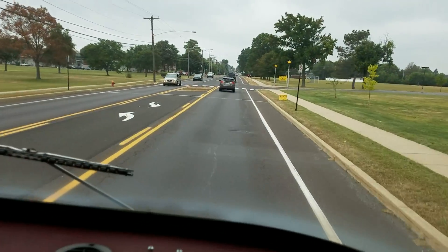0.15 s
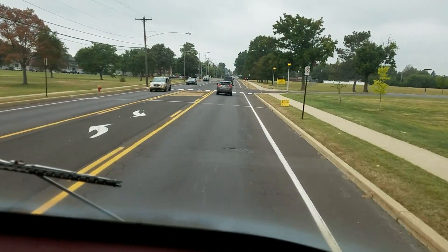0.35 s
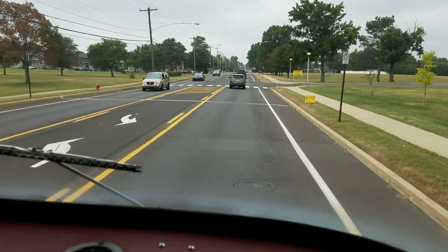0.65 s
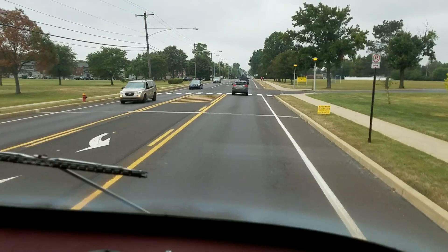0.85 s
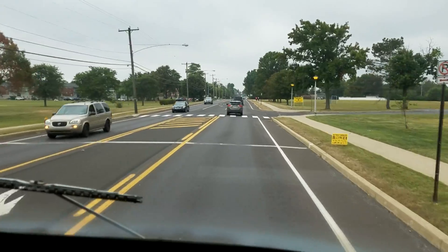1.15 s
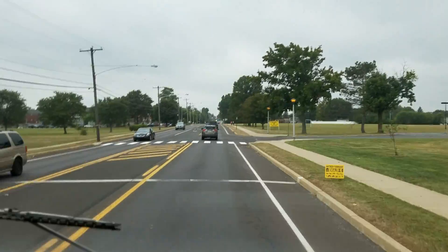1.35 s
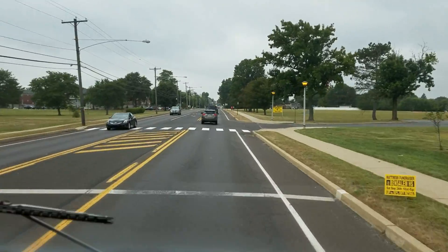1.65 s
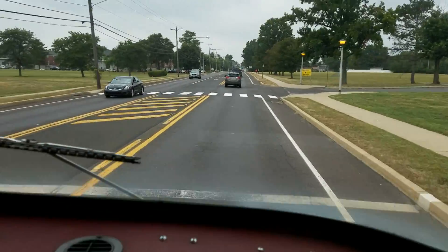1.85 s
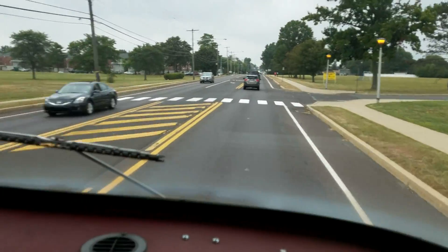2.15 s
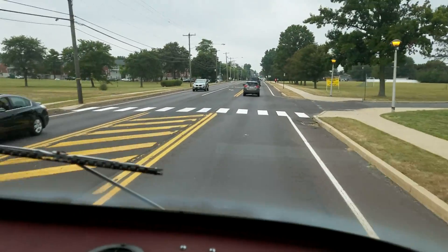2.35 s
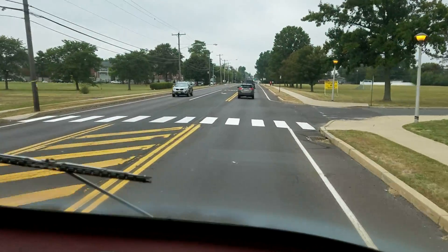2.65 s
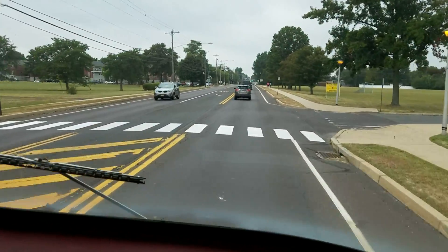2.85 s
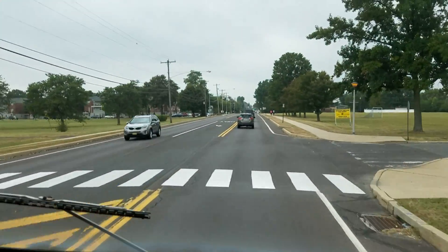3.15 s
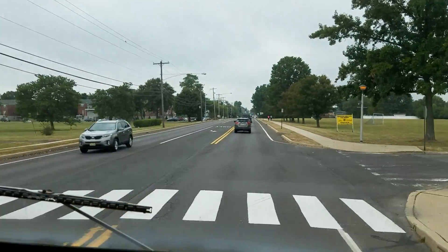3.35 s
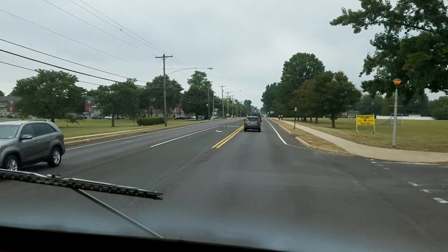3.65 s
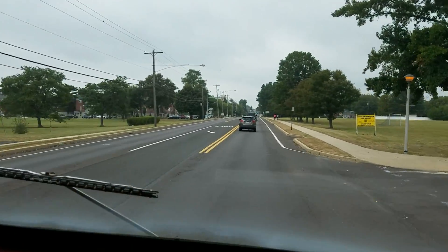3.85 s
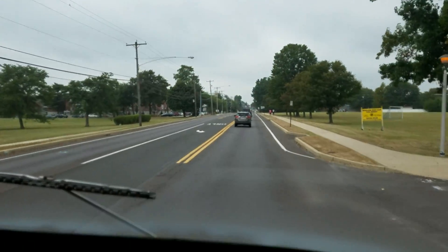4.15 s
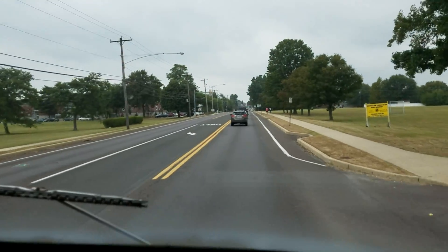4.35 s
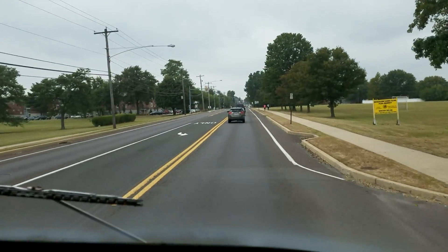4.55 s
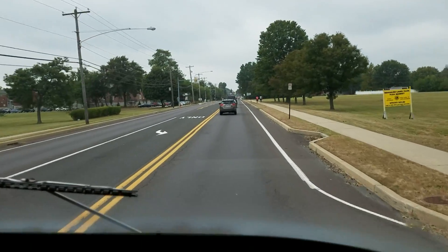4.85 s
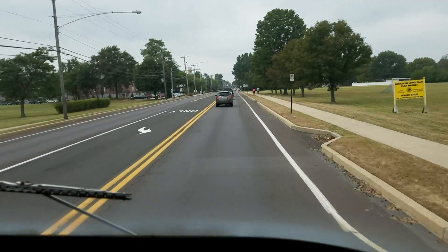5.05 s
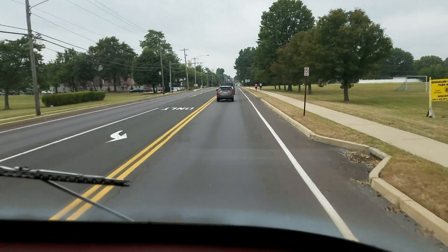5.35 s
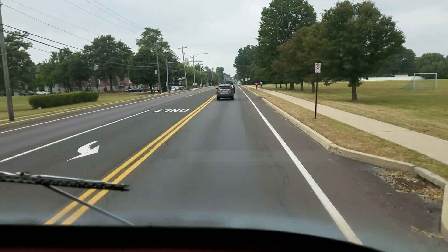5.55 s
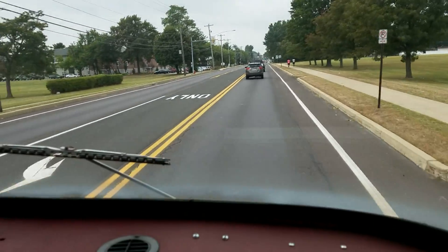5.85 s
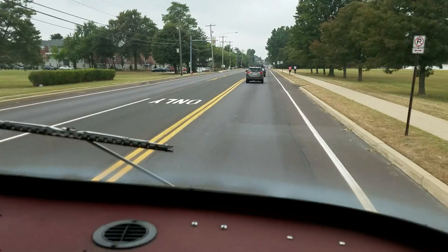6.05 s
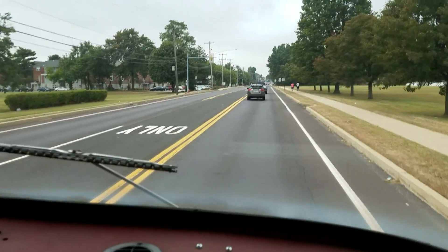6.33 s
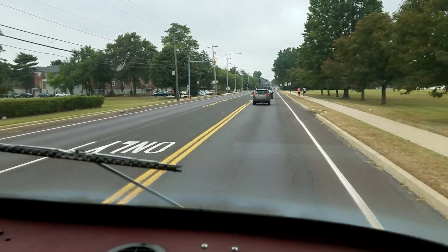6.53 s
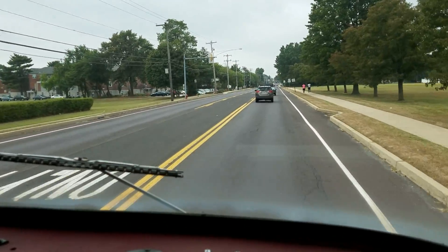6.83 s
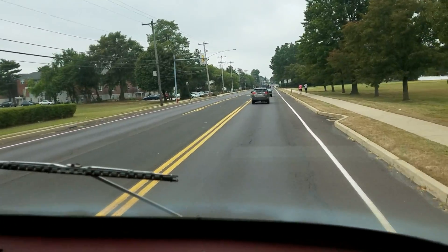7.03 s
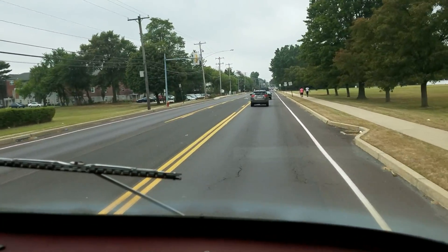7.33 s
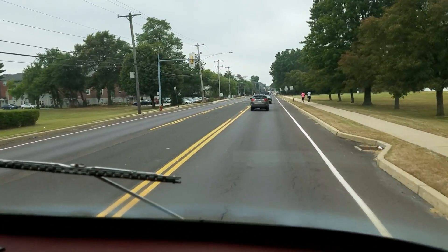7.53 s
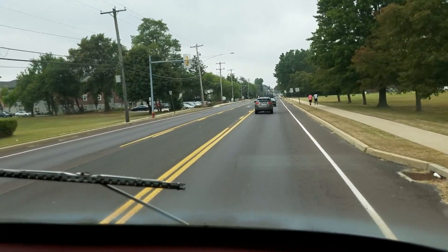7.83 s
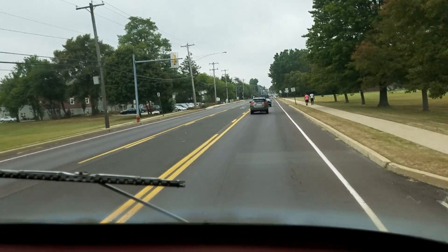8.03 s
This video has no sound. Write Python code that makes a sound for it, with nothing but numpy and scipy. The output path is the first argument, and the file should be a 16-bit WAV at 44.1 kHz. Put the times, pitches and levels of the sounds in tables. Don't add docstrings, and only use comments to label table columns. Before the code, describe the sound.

Deep, buzzing diesel engine drone from inside a moving truck cab, swelling and easing over rumbling road, with knocks, rattles and wind thumps.

```python
import sys
import numpy as np
from scipy import signal
from scipy.fft import rfft, irfft, next_fast_len
from scipy.io import wavfile
from scipy.ndimage import uniform_filter1d, minimum_filter1d, map_coordinates

SR = 44100
rng = np.random.default_rng(int(sys.argv[2]) if len(sys.argv) > 2 else 0)


def boost(x):
    u = np.asarray(x, float) / 20
    return 10 ** u


def store_wav(level_fs):
    pcm = np.round(np.clip(np.atleast_2d(level_fs), -1, 1) * 32767)
    wavfile.write(sys.argv[1], SR, pcm.T.astype(np.int16))


N = 361175

# time_s, speed_rpm
CRANK_SPEED = [
    (0, 1553),
    (0.8, 1547),
    (2.0, 1534),
    (2.8, 1532),
    (4.4, 1542),
    (5.6, 1548),
    (6.1, 1555),
    (6.8, 1546),
    (7.6, 1524),
    (8.19, 1502),
]
# order, left_db, right_db, load_share (-0.2 to 2)
CRANK_ORDERS = [(3, -37, -38, 0.5), (4, -17, -19, 0.5), (5, -27, -24, 0.1), (6, -25, -27, 0.9),
                (7, -36, -36, -0.2), (8, -16, -16, 1.3), (9, -24, -23, 0.7), (10, -41, -44, 0.2),
                (11, -23, -28, 1.1), (12, -36, -35, 0.9), (13, -43, -41, 1.5), (15, -34, -40, 0.8),
                (16, -43, -37, 0.9), (17, -34, -40, 2.0), (20, -39, -34, 0.8), (21, -40, -39, 1.0),
                (22, -39, -39, 1.0), (23, -43, -55, 0.6), (24, -37, -51, 0.0), (25, -46, -43, 0.1),
                (28, -40, -45, 0.0), (29, -38, -36, 0.5), (30, -40, -41, 1.2), (31, -41, -47, 0.5),
                (33, -40, -50, 0.5), (35, -42, -42, 0.8), (36, -45, -40, 1.0), (38, -41, -47, 1.1),
                (40, -40, -38, 0.8), (42, -36, -47, 1.2)]
# order, level_db
COASTING_GEARS = [
    (14, -37),
    (32, -36),
]
# time_s, load_db (against full throttle)
THROTTLE = [(0, -7), (.32, -14), (.64, -9), (1.0, -10), (1.28, -5), (1.44, -6), (1.7, -1.2), (2.1, -1.5),
            (2.5, -0.2), (5.45, -1.04), (5.6, -1), (5.76, -7.5), (6.4, -4), (6.7, -9), (7.04, -2),
            (7.36, -5), (7.55, -11.5), (8.19, -11.5)]
# time_s, lift_db, length_s
CAB_SWAY = [
    (.5, -1.5, .5),
    (1.497, 5.5, 0.12),
    (1.998, 2.5, 0.066),
    (2.724, -1, 0.049),
    (3.5, -2.2, .4),
    (3.998, 3, 0.12),
    (4.55, 2, 0.41),
    (5.45, 1.5, .15),
    (6.245, 2, .2),
    (7.35, -6, 0.42),
]
# time_s, coarseness_db
ROAD_SURFACE = [(0, -3.5), (.8, -4), (1.12, -4.5), (1.37, 2.5), (1.9, 2.5), (2.64, 2.5), (3.03, 1),
                (4.72, 0.5), (5.5, 0.4), (5.77, -2), (6.5, -3.5), (6.75, -2), (7.21, 3.5), (7.37, 3.5),
                (7.53, -0.7), (8.19, 0.2)]
# time_s, rumble_lift_db, length_s
SEAM_BUMPS = [(.01, 5.5, .06), (.24, -1, 0.16), (1.4, 7, 0.21), (1.8, 6, 0.27), (2.7, 4.5, .1),
              (4.88, 6, 0.055), (5.15, 3.5, .15), (5.5, 4, 0.093), (5.75, 3.5, 0.4), (7.21, 5, 0.18),
              (7.55, 2.5, 0.18), (8.1, 3, 0.27)]
# time_s, lift_db, length_s
WHINE_SWELLS = [(.93, 9, 0.2), (1.64, 12, .06), (1.93, 7, .05), (2.2, 11, 0.35), (3.24, 5, 0.084),
                (3.44, 15, 0.03), (4.0, 7.5, .4), (4.63, 10, 0.031), (4.95, 11, 0.069), (5.31, 14, 0.062),
                (6.2, 9.5, 0.26), (6.45, 6, 0.038), (7.05, 6.5, 0.3), (7.5, 13, 0.4), (8.19, 7, 0.15)]
# time_s, peak_db
TRIM_RATTLES = [(0.0258, -40), (0.6913, -39), (0.895, -43), (1.085, -42), (1.3504, -22), (1.4711, -36),
                (1.5354, -29), (1.5788, -41), (1.6821, -31), (1.8362, -31), (1.8557, -30), (2.0203, -40),
                (2.1355, -36), (2.5541, -40), (3.1852, -40), (3.457, -38), (3.5753, -31), (3.7479, -28),
                (3.9973, -34), (4.2228, -34), (5.0444, -36), (5.6291, -40), (6.0916, -35), (7.1172, -38),
                (7.3986, -35), (7.8785, -33)]
# time_s, peak_db
DASH_KNOCKS = [(1.3094, -28), (1.3464, -28), (1.3653, -18.5), (1.3994, -26), (1.4394, -26), (1.5094, -29),
               (1.5344, -21), (1.6444, -22), (1.6844, -23), (1.7294, -23), (1.8312, -32), (1.8694, -26),
               (3.759, -26)]
# time_s, peak_db, pitch_hz, fade_by_60_db_s
METAL_CHINKS = [
    (.3295, -16, 2600, .01),
    (1.339, -31, 9700, .04),
    (1.378, -37, 8900, .2),
    (1.471, -25, 8950, .08),
    (1.569, -29, 8350, .1),
]
# time_s, level_db, length_s
DRAUGHT_FLAPS = [(0.141, -10, 0.045), (0.193, -12, 0.056), (0.235, -6.5, 0.041), (0.33, -7.5, 0.039),
                 (0.408, -11.5, 0.029), (0.585, -5, 0.021), (1.247, -10, 0.037), (2.346, -8, 0.046),
                 (2.596, -8.5, 0.018), (2.779, -6.5, 0.036), (3.309, -9.5, 0.03), (3.354, -9, 0.021),
                 (4.538, -8, 0.027), (4.62, -9, 0.02), (4.886, -6, 0.071), (5.103, -9, 0.015),
                 (5.197, -5.5, 0.014), (5.259, -11, 0.047), (5.36, -5.5, 0.018), (5.507, -10, 0.026),
                 (5.561, -8.5, 0.053), (5.721, -8.5, 0.019), (5.998, -13, 0.067), (6.149, -6, 0.02),
                 (7.224, -4, 0.019), (7.302, -4, 0.024), (7.379, -3.5, 0.033), (7.766, -13, 0.049),
                 (8.049, -4, 0.045), (8.159, -2, 0.036)]
# time_s, level_db, pitch_hz
DRAUGHT_SNAPS = [(0.097, -6, 340), (0.224, -9, 560), (0.203, -4, 465), (0.233, -5, 418), (0.329, -4, 380),
                 (0.581, 1.5, 328), (0.656, -5.5, 547), (2.349, -10, 401), (2.766, -8, 669),
                 (2.773, -9, 426), (3.66, -7, 850), (4.879, -8, 450), (4.889, -1, 507), (4.91, -2, 424),
                 (5.161, -2.5, 361), (5.499, -6, 399), (5.513, -8, 368), (5.521, -7, 417),
                 (5.559, 0.5, 384), (5.715, -1, 361), (5.73, -5, 443), (6.0, -8, 432), (6.145, 2, 382),
                 (7.228, 0, 372), (7.25, 0, 401), (8.045, -7, 410), (8.059, -0.5, 398), (8.129, -3, 484),
                 (8.14, 1, 361), (8.159, 0, 463)]
# frequency_hz, level_db (per Hz)
RUMBLE_COLOUR = [(15, -40), (30, -11.5), (60, -7), (100, 1), (140, -3), (200, -7), (300, -4), (400, -15),
                 (600, -20), (1200, -51)]
# frequency_hz, level_db (per Hz)
ROAR_COLOUR = [(180, -60), (300, -16), (350, -16), (427, -10), (480, -9), (522, -13.5), (751, -9),
               (929, -13.5), (1040, -7.5), (1130, -10), (2070, -15.5), (2650, -27.5), (5000, -39),
               (6500, -76), (11000, -120)]
# frequency_hz, level_db (per Hz)
HISS_COLOUR = [(1470, -38), (2500, -1.5), (2660, -7.5), (3600, -7), (4570, -8), (5990, -13), (7440, -15.5),
               (8680, -12), (10400, -19.5), (15100, -18), (15900, -26)]
# frequency_hz, level_db (per Hz)
TIZZ_COLOUR = [(5000, -30), (8000, -13), (11000, -1), (15500, -5), (17000, -20)]
# frequency_hz, level_db (per Hz)
CLACK_COLOUR = [(600, -3), (1200, -2), (2200, 3), (2900, -10), (4500, -13), (7000, -18.5), (12000, -45)]
# frequency_hz, likeness (-1 to 1)
EAR_LIKENESS = [(25, 0.45), (60, 0.97), (250, 0.71), (500, 0.63), (900, -0.097), (1500, -0.28),
                (3000, 0.11)]


def unit(x):
    return x / np.sqrt(np.mean(x ** 2) + 1e-20)


def tilt(db):
    return np.array([[db], [-db]])


def along(points, hz):
    f, v = np.transpose(points)
    return np.interp(np.log(hz + 1), np.log(f + 1), v)


def curve(rows):
    times, values = np.transpose(rows)
    return np.interp(np.arange(N) / SR, times, values)


def humps(rows):
    t = np.arange(0, N + 64, 64) / SR
    lift_db = sum(db * np.exp(-((t - s) / length) ** 2) for s, db, length in rows)
    return np.interp(np.arange(N) / SR, t, lift_db)


def driven(db, per_load, per_road):
    return db + per_load * curve(THROTTLE) + per_road * curve(ROAD_SURFACE)


def wobble(rate):
    coarse = np.arange(0, N + 64, 64)
    knots = rng.standard_normal(600)
    drift = map_coordinates(knots, [coarse * rate / SR])
    return np.interp(np.arange(N), coarse, drift).astype(np.float32)


def filtered(x, response):
    m = next_fast_len(N + 8192)
    return irfft(rfft(x, m) * response(np.fft.rfftfreq(m, 1 / SR)), m)[..., :N]


def rush(spectrum, patchy_db):
    z = signal.stft(rng.standard_normal((2, N)), nperseg=512)[2]
    patches = uniform_filter1d(rng.standard_normal(z.shape[1:]), size=5, axis=0)
    patches = uniform_filter1d(patches, size=10, axis=1)
    pair = signal.istft(z * boost(patchy_db * unit(patches)), nperseg=512)[1][:, :N]

    def mid_side_gain(hz):
        turn = np.arccos(np.clip(along(EAR_LIKENESS, hz), -1, 1)) / 2
        return boost(along(spectrum, hz)) * [np.cos(turn), np.sin(turn)]

    mid, side = filtered(pair, mid_side_gain)
    return unit(np.array([np.roll(mid + side, shift=-3), mid - side]))


def bursts(rows, length):
    envelope = np.zeros(N + SR)
    u = np.arange(SR // 8) / SR / length
    shape = (1 - np.exp(-u / 0.046)) * np.exp(-u ** 1.5)
    for s, db in rows:
        envelope[round(s * SR):][:len(u)] += boost(db) * shape
    return envelope[:N]


def drone(crank):
    tracked_db = {
        8: driven(-15.5, 1.06, 0.01),
        4: driven(-17, 0.29, 0.34) + humps(CAB_SWAY),
        5: driven(-28, -0.26, 0.96),
        11: driven(-21.5, 1.05, 0.1),
    }
    load_db = uniform_filter1d(curve(THROTTLE), size=8000)
    out = np.zeros((2, N))
    for order, left_db, right_db, share in CRANK_ORDERS:
        k = round(order)
        waver_db = 1.2 * wobble(3.49)
        if k in tracked_db:
            level_db = tracked_db[k] + 0.44 * waver_db
        else:
            level_db = left_db + 0.088 * k + 1.16 * share * load_db + waver_db
        spread = 1.665 * k * k + 4.62 * (k % 4 > 0)
        angle = k * crank + spread + (0.16 + 0.0051 * k) * wobble(5.5)
        lead = float(-0.008 * k + 0.00028 * k * k * rng.standard_normal())
        size = np.sqrt(2) * boost(level_db)
        out[0] += size * np.sin(angle + lead)
        out[1] += boost(right_db - left_db) * size * np.sin(angle)
    closed = np.clip((np.arange(N) / SR - 7.35) / 0.1, 0, 1)
    for order, db in COASTING_GEARS:
        level = boost(db + 3.2 * wobble(5.7) + 2)
        out += closed * level * np.sin(round(order) * crank + 0.41 * wobble(9.5))
    return out


def roar(lift_db):
    level_db = driven(-23.5, 0.035, 1) + 0.035 * lift_db + 0.35 * wobble(12)
    return boost(level_db + tilt(1.1)) * rush(ROAR_COLOUR, patchy_db=0.4)


def rushing_air(lift_db):
    level_db = driven(-44.5, 0.03, 1.27) + 0.063 * lift_db + 4.5 + 0.73 * wobble(2.9)
    return boost(level_db + tilt(0.9)) * rush(HISS_COLOUR, patchy_db=1.2)


def road_rumble(lift_db):
    level_db = driven(-31, -0.03, 0.43) + lift_db + 6.0 + 0.37 * wobble(2.7)
    return boost(level_db) * rush(RUMBLE_COLOUR, patchy_db=0.25)


def blower(centre_hz=2022):
    t = np.arange(N) / SR
    fray = np.interp(t, [6.8, 7.1, 7.7, 8], [0.16, 1.4, 2.1, 0.44])
    angle = 2 * np.pi * centre_hz * t
    angle = angle + 1.05 * wobble(4.6) + 0.56 * wobble(20) + fray * wobble(60)
    level_db = -47 + humps(WHINE_SWELLS) + 3.0 + 0.57 * wobble(25)
    return boost(level_db + tilt(1.1)) * np.sin([angle, angle + 0.71])


def metal_chinks():
    ring = np.zeros((2, N + SR))
    t = np.arange(SR // 4) / SR
    for s, db, hz, t60 in METAL_CHINKS:
        detune = 0.011 * np.linspace(-1, 1, num=5)[:, None] + 0.0085 * rng.standard_normal((5, 1))
        phase = rng.uniform(0, 2 * np.pi, (2, 5, 1))
        tone = np.sin(2 * np.pi * hz * (1 + detune) * t + phase).sum(axis=1)
        fade = boost(db - 4.5 - 60 * t / t60) * (1 - np.exp(-t / 0.00077))
        start = round(s * SR)
        ring[:, start:start + len(t)] += fade * tone
    return ring[:, :N]


def trim():
    grit = boost(3.2 * uniform_filter1d(rng.standard_normal(N), size=60) * np.sqrt(60))
    tizz_noise = unit(grit * rush(TIZZ_COLOUR, patchy_db=1.0))
    clack_noise = unit(grit * rush(CLACK_COLOUR, patchy_db=1))
    tizz = boost(-7.5) * bursts(TRIM_RATTLES, length=0.026) * tizz_noise
    clack = boost(1.5) * bursts(DASH_KNOCKS, length=0.026) * clack_noise
    return boost(tilt(0.8)) * (tizz + clack) + metal_chinks()


def draught():
    slap = np.zeros(N + SR)
    t = np.arange(SR // 4) / SR - 1 / 8
    f = np.fft.rfftfreq(len(t), 1 / SR) + 1
    eddy_colour = np.exp(-(np.log(f / 134) / 0.81) ** 2)
    for s, db, length in DRAUGHT_FLAPS:
        shape = np.exp(-(t / (0.56 * length)) ** 2) + 0.12 * np.exp(-np.abs(t) / 0.29)
        lump = shape * irfft(rfft(rng.standard_normal(len(t))) * eddy_colour, len(t))
        slap[round(s * SR):][:len(t)] += boost(db + 5.0) * lump / np.abs(lump).max()
    for s, db, hz in DRAUGHT_SNAPS:
        cycles = hz * t
        width = np.where(t < 0, 0.35, 0.59)
        shape = np.exp(-(cycles / width) ** 2)
        snap = shape * np.sin(2 * np.pi * cycles / (1 + 0.23 * np.abs(cycles)))
        slap[round(s * SR):][:len(t)] += boost(db + 1.0) * snap
    slap = filtered(slap[SR // 8:][:N], lambda hz: hz ** 3 / (hz ** 3 + 50 ** 3))
    return boost(np.array([[-22], [0]])) * slap


def scene():
    turns = np.cumsum(curve(CRANK_SPEED) / 60 / SR)
    crank = 2 * np.pi * (turns % 1).astype(np.float32)
    lift_db = humps(SEAM_BUMPS)
    beat = 1 + 0.084 * np.cos(crank)
    engine = drone(crank) + beat * (roar(lift_db) + rushing_air(lift_db))
    return engine + road_rumble(lift_db) + blower() + trim() + draught()


def roll_off(x):
    return signal.sosfilt(signal.butter(12, 15840, fs=SR, output="sos"), x)


def record(dry):
    need = np.minimum(1, 0.85 / (np.abs(dry).max(axis=0) + 1e-9))
    gain = uniform_filter1d(minimum_filter1d(need, size=900), size=500)
    mix = filtered(dry * gain, lambda hz: hz < 15830)
    return roll_off(mix)


dry = scene()
out = record(dry)
store_wav(out)
```